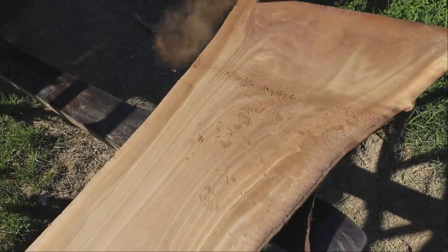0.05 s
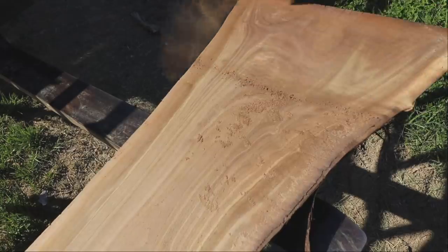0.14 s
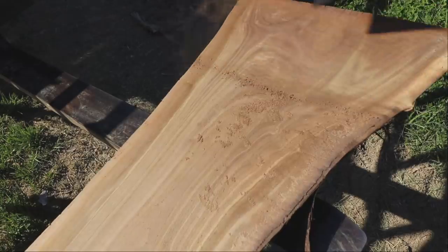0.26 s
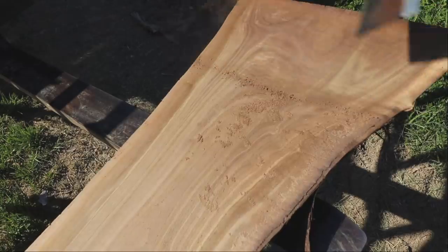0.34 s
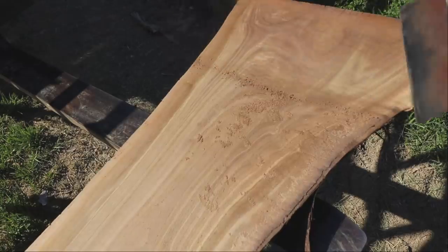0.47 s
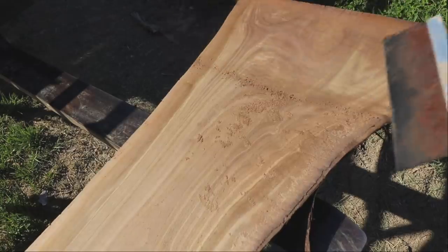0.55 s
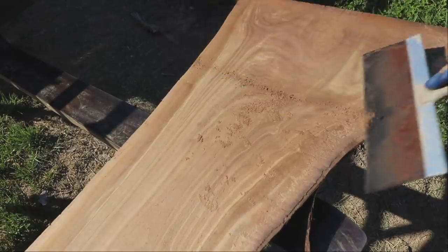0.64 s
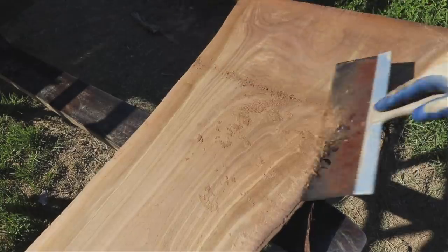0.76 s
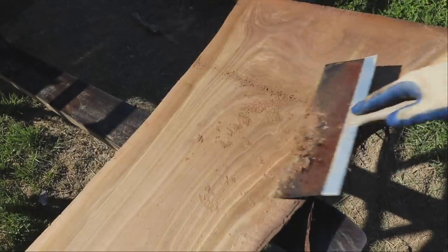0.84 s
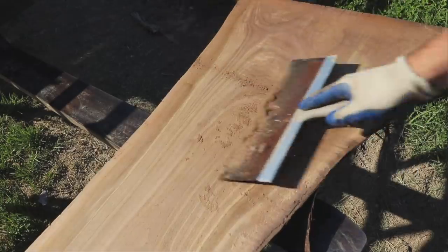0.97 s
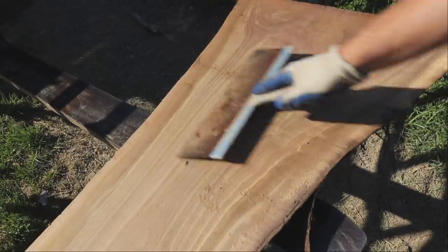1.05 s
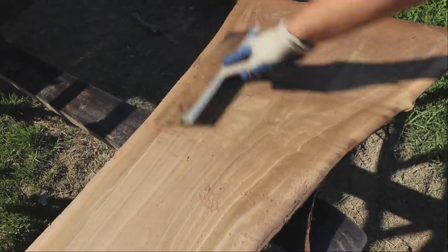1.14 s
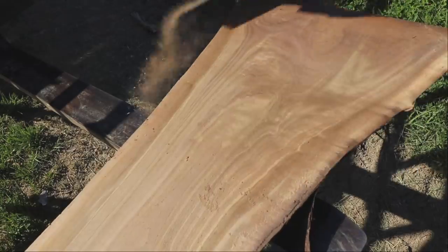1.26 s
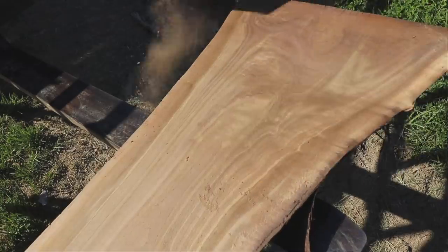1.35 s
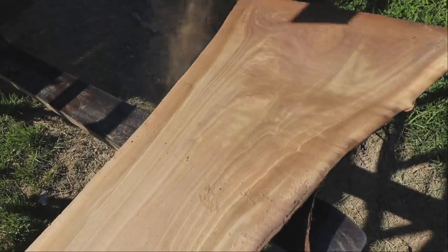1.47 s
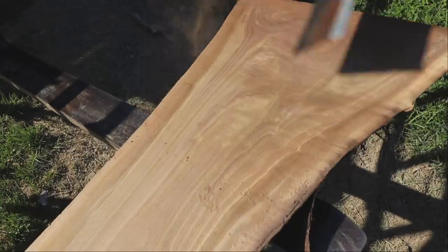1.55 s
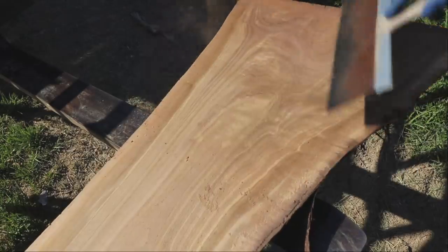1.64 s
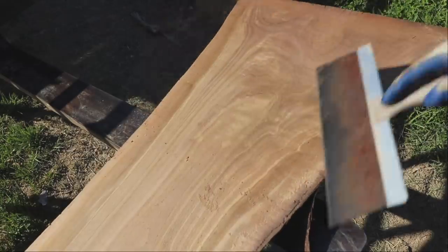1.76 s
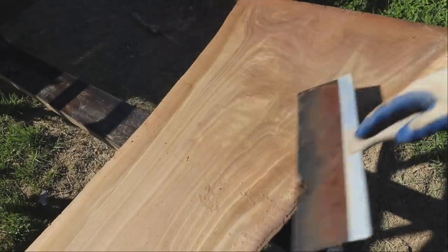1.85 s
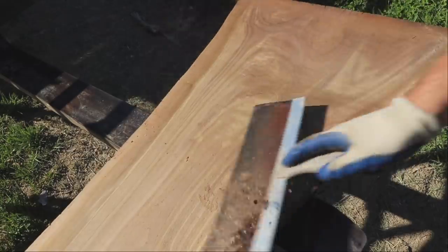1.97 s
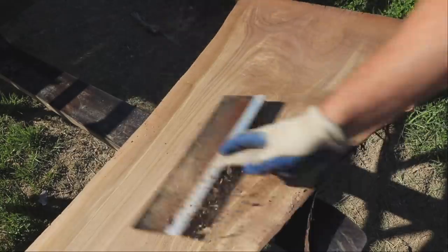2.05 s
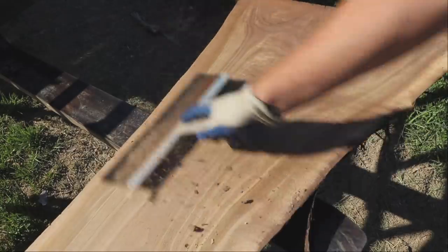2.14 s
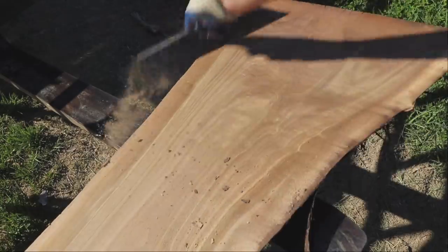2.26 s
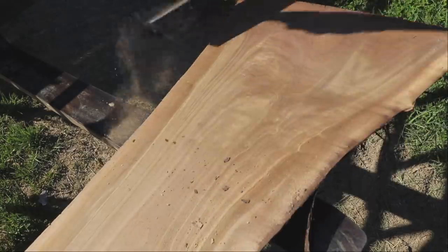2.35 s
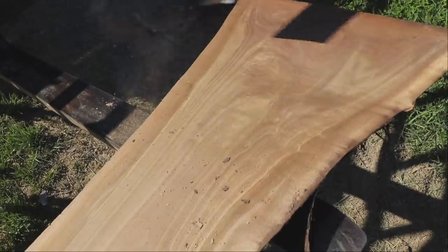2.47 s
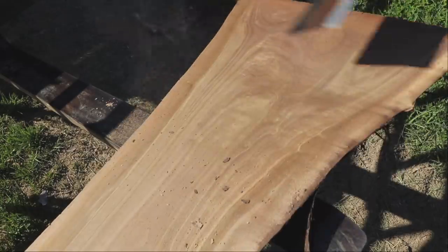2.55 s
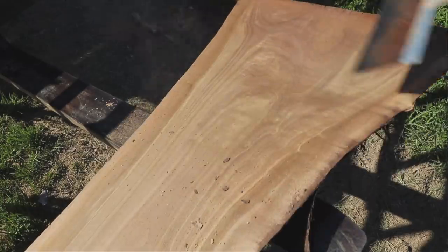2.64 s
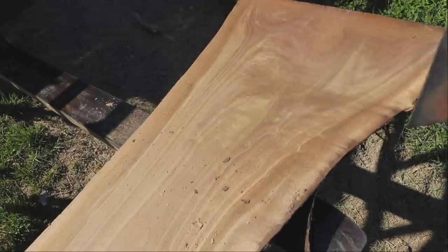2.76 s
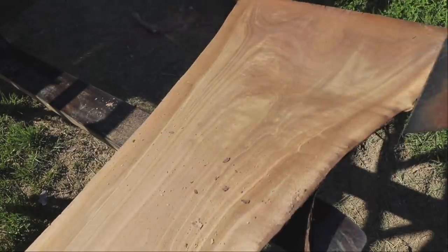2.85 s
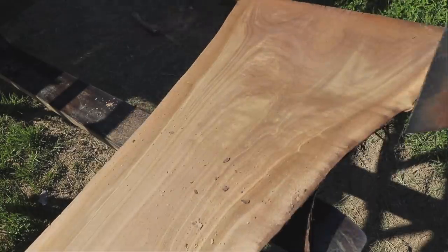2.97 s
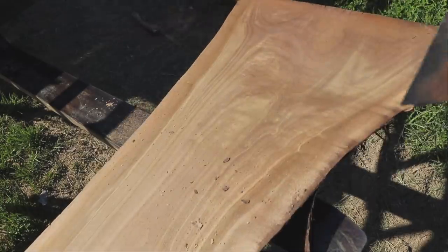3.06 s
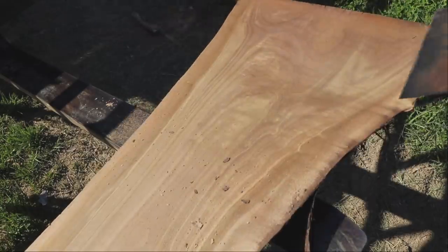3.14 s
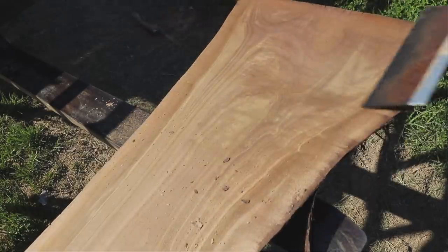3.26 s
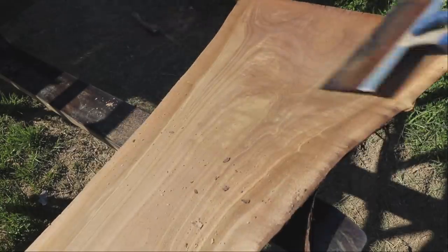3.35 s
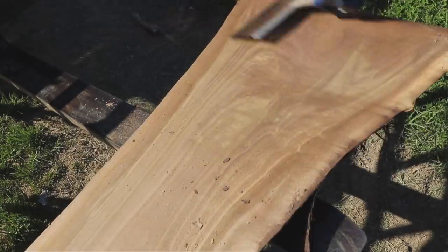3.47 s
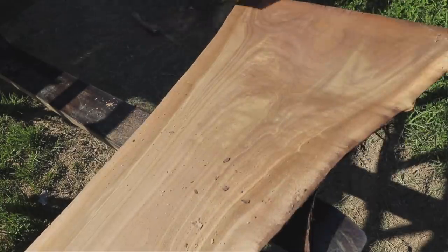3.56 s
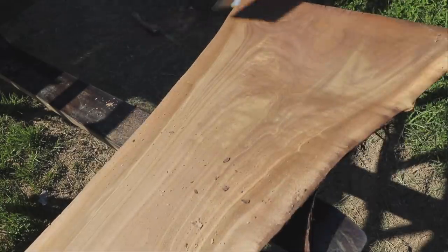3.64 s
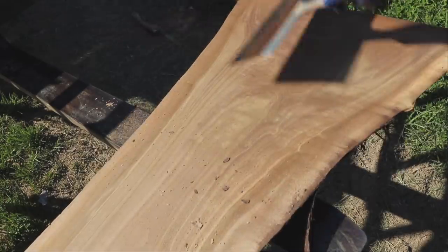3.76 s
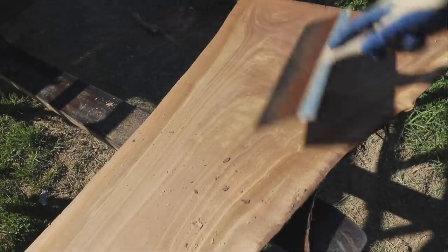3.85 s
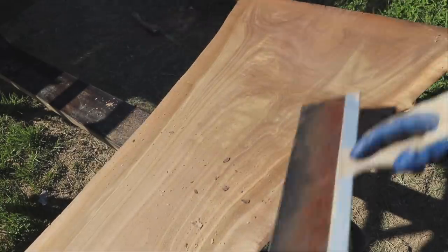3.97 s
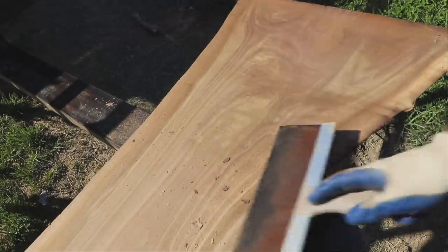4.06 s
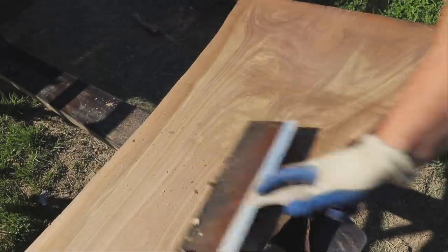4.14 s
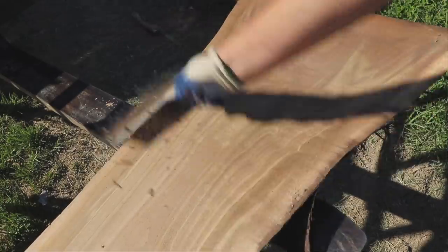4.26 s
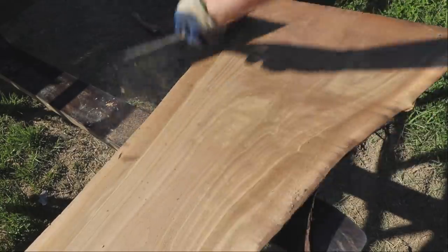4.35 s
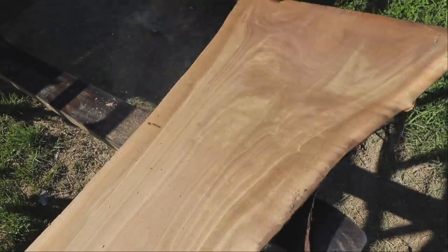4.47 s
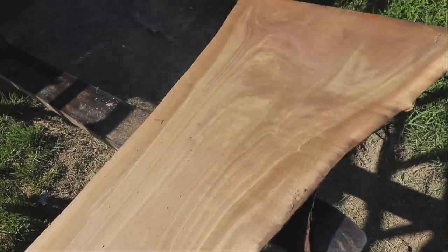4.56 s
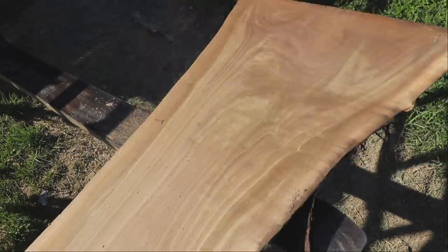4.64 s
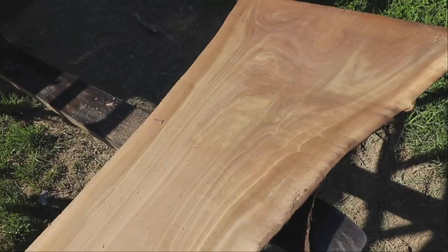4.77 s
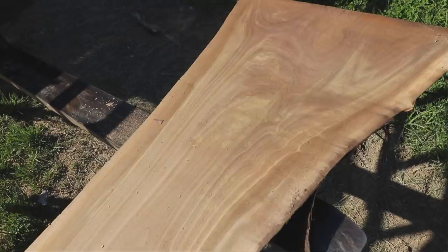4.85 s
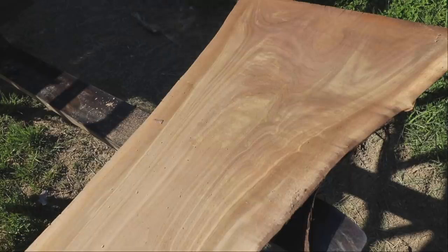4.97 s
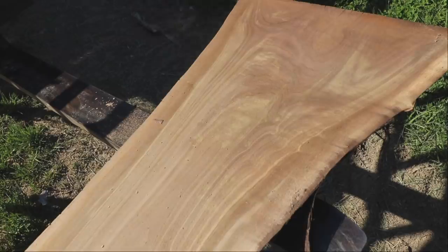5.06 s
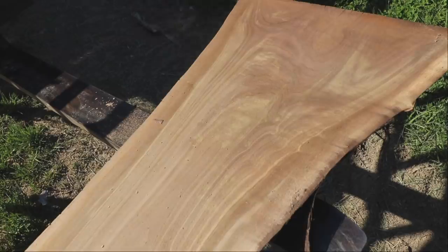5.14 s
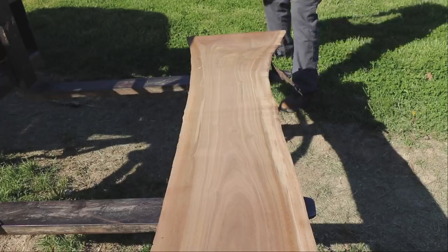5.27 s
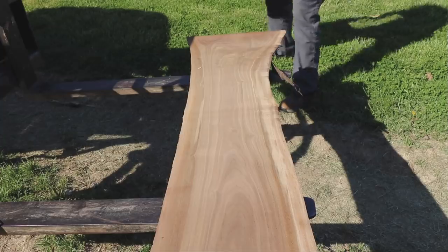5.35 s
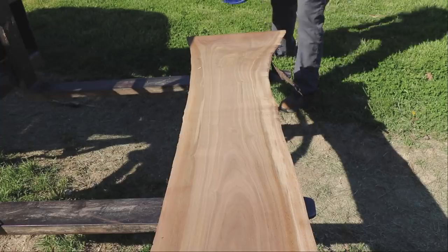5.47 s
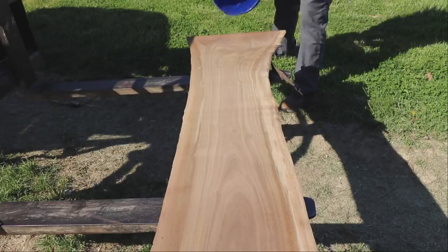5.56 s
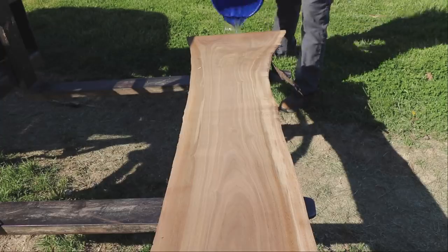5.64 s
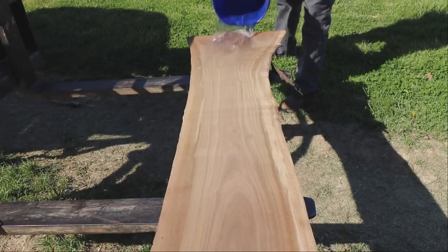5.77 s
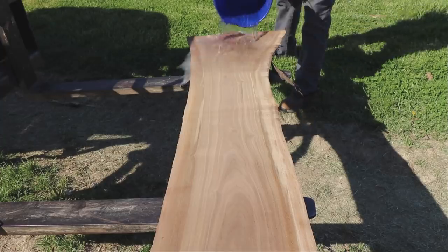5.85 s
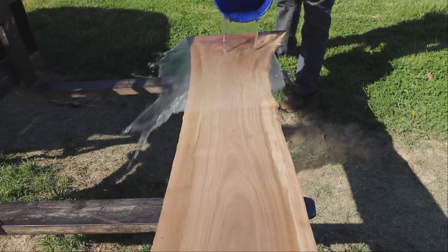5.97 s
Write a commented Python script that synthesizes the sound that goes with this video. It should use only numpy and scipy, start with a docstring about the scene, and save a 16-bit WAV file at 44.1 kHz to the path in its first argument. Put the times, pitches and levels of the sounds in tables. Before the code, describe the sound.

Five harsh metallic scrapes across a wooden plank outdoors, each cut off at the edge with a thin ring, ending in low wind buffeting and water.

```python
"""Outdoors at a wooden slab: a wide steel scraper pushes sawdust off in five strokes. The blade knocks
down (damped steel noise, slab modes), rasps over the grain (random slips through blade resonances),
skids off the edge and rings freely (decaying modes), while dust patters down (clouds of tiny impacts).
A few faint creaks; later, wind buffets the microphone (low noise in lumps) and the first water from a
bucket splashes on the slab (short clouds of impacts)."""
import sys
import numpy as np
from scipy import signal
from scipy.fft import rfft, irfft, next_fast_len
from scipy.io import wavfile
from scipy.ndimage import uniform_filter1d, map_coordinates

SR = 44100
rng = np.random.default_rng(int(sys.argv[2]) if len(sys.argv) > 2 else 0)


def log_audio(samples):
    """Write samples as a 16-bit WAV file to the path given in sys.argv[1]."""
    # one column per channel
    frames = np.atleast_2d(samples).T
    # limit to full scale, then quantise
    limited = np.clip(frames, -1, 1)
    pcm = np.round(limited * 32767).astype(np.int16)
    wavfile.write(sys.argv[1], SR, pcm)


N = 265041
TIME_S = np.arange(N) / SR
LOCAL_S = np.arange(SR * 3 // 4) / SR  # time within one stroke or event


def amp(db):
    """Decibels to gain."""
    return 10 ** (np.asarray(db) / 20)


def unit(x):
    """Scale to rms 1."""
    return x / np.sqrt(np.mean(x ** 2) + 1e-20)


def along(points, hz):
    """(Hz, value) points interpolated on a log frequency axis."""
    f, v = np.transpose(points)
    return np.interp(np.log(hz + 1), np.log(f), v)


def wobble(knots_per_s, size):
    """Smooth random curve through normally distributed knots."""
    knots = rng.standard_normal(int(size * knots_per_s / SR) + 4)
    coarse = np.arange(0, size + 64, 64)
    curve = map_coordinates(knots, [coarse * knots_per_s / SR])
    return np.interp(np.arange(size), coarse, curve)


def gate(length_s, rise_s, fall_s):
    """Linear rise, hold until length_s, then exponential decay of time constant fall_s."""
    opening = np.clip(LOCAL_S / rise_s, 0, 1)
    return opening * np.exp(-np.maximum(LOCAL_S - length_s, 0) / fall_s)


def coloured(x, gain):
    """Causal minimum-phase filter of magnitude gain(Hz), via the folded cepstrum."""
    m = 2 * next_fast_len(len(x) // 2 + 4096)
    magnitude = np.maximum(gain(np.fft.rfftfreq(m, 1 / SR)), 1e-6)
    cepstrum = irfft(np.log(magnitude))
    cepstrum[1:m // 2] *= 2
    cepstrum[m // 2 + 1:] = 0
    return irfft(rfft(x, m) * np.exp(rfft(cepstrum)))[:len(x)]


def grains(rate_hz, spread_db):
    """Random tiny impacts of uneven strength and sign, rms 1."""
    size = len(LOCAL_S)
    hits = rng.random(size) < rate_hz / SR
    sizes = amp(spread_db * np.clip(rng.standard_normal(size), -2, 2))
    return unit(hits * sizes * rng.choice([-1, 1], size))


def ring(modes, scatter_db):
    """Exponentially decaying modes at fresh random strengths, starting near rms 1."""
    hz, db, t60_s = np.transpose(modes)[:, :, None]
    gains = amp(db + scatter_db * rng.standard_normal(hz.shape))
    gains = gains * rng.choice([-1, 1], hz.shape)
    waves = np.sin(2 * np.pi * hz * LOCAL_S) * np.exp(-np.log(1000) * LOCAL_S / t60_s)
    return np.sqrt(2) * (gains * waves).sum(0) / np.linalg.norm(gains)


def burst(t60_s, size):
    """White noise that decays exponentially."""
    return rng.standard_normal(size) * np.exp(-np.log(1000) * np.arange(size) / SR / t60_s)


def add(track, start_s, sound):
    """Mix a sound in at start_s."""
    part = track[max(round(start_s * SR), 0):][:len(sound)]
    part += sound[:len(part)]


def outdoors():
    """Steady distant background, plus low-frequency lumps of wind on the microphone."""
    # background spectrum: (f/Hz, relative density/dB)
    air_spectrum = [(59, -31), (100, -7.5), (206, -8.5), (295, -11.5), (365, -18.5), (721, -20),
                    (872, -23.5), (1680, -29.5), (14400, -43.5), (16000, -44.5)]
    # background level: (t/s, level/dB)
    air_level = [(0, -58.5), (5.2, -58), (5.65, -61), (6, -58)]
    # buffeting spectrum: (f/Hz, relative density/dB)
    buffet_spectrum = [(12, -38.5), (20, -8), (53, 4), (97, 1.5), (141, -1.5), (228, -14.5), (252, -18),
                       (600, -43), (780, -79.5), (1320, -120)]
    # buffeting before random wobble: (t/s, level/dB)
    wind = [(0, -63), (1.85, -63), (2.3, -67), (4.05, -65), (4.55, -49.5), (5.05, -50), (5.38, -33.5),
            (5.82, -35), (6.01, -44)]
    # brief puffs before random wobble: (t/s, level/dB)
    gusts = [(.84, -56), (1.54, -54), (1.88, -54), (3.0, -55), (4.75, -46)]
    gust_s = .04  # from peak to 1/e
    m = next_fast_len(N)
    hz = np.fft.rfftfreq(m, 1 / SR)

    def noise(spectrum):
        """Gaussian noise shaped to a spectrum, rms 1."""
        shaped = rfft(rng.standard_normal(m)) * amp(along(spectrum, hz))
        return unit(irfft(shaped, m)[:N])

    air_db = np.interp(TIME_S, *np.transpose(air_level))
    wind_db = np.interp(TIME_S, *np.transpose(wind))
    puffs = sum(amp(db) * np.exp(-((TIME_S - s) / gust_s) ** 2) for s, db in gusts)
    buffet = (amp(wind_db) + puffs) * amp(2.7 * wobble(22, N))
    return noise(air_spectrum) * amp(air_db) + noise(buffet_spectrum) * buffet


def pressed_blade(hz, edge_hz, stiffness):
    """Gain of the loaded blade: broad resonances, 9 dB shelf below its lowest flexing frequency."""
    # blade pressed on the wood: (f/Hz, relative density/dB)
    base = [(80, -50.5), (350, -22), (560, -6), (800, -7.5), (980, 1), (1300, -1.5), (1800, -3), (2200, -7),
            (3500, -11), (4300, -21), (6500, -28.5), (9000, -36), (12000, -39), (15500, -48)]
    # its resonances: (f at stiffness 1/Hz, width/Hz, boost/dB)
    flex = [(1680, 100, 2.5), (3554, 180, 7), (5140, 310, 5.5), (7700, 270, 2.5), (10000, 400, 6),
            (12400, 370, 2)]
    boost_db = sum(db * np.exp(-((hz - fc * stiffness) / width) ** 2) for fc, width, db in flex)
    shelf_db = -9 / (1 + (hz / edge_hz) ** 12)
    return amp(along(base, hz) + boost_db + shelf_db)


def shifting(x, depth_db):
    """The contact line wanders along the blade: patches of the spectrum swell and fade."""
    z = signal.stft(x, nperseg=512)[2]
    field = uniform_filter1d(rng.standard_normal(z.shape), size=3, axis=0)
    field = uniform_filter1d(field, size=9, axis=1)
    return signal.istft(z * amp(depth_db * unit(field)), nperseg=512)[1][:len(x)]


def radiated(x):
    """The open slab radiates its own modes but hardly any deep bass: 130-600 Hz band-pass."""
    return signal.sosfilt(signal.butter(3, [130, 600], "bandpass", fs=SR, output="sos"), x)


def scrape(rasp_db, grit_db, drone_db, edge_hz, stiffness, t60_s, bright_db_per_oct):
    """The edge catches and slips on fibres thousands of times a second, shaking blade and slab."""
    # slab under the pressing blade: (f/Hz, relative level/dB, t60/s)
    drone = [(175, -9, 0.047), (277, 0, 0.054), (346, -0.5, .08)]
    size = len(LOCAL_S)

    def blade(hz):
        return pressed_blade(hz, edge_hz, stiffness)

    def treble(hz):
        return 1 - 1 / (1 + (hz / 6200) ** 10)

    def rasp_gain(hz):
        tilt_db = bright_db_per_oct * np.log2(hz / 1500 + .1)
        return blade(hz) * amp(tilt_db) * np.sqrt(1 - treble(hz))

    slips = grains(rate_hz=13000, spread_db=3.5) * amp(.9 * wobble(110, size))
    # the wood damps the steel, so each slip rings only briefly
    steel = 0.027 * burst(t60_s, size=SR // 4)
    steel[0] += 1
    shaken = signal.fftconvolve(slips, steel)[:size]
    rasp = amp(rasp_db) * unit(shifting(coloured(shaken, rasp_gain), depth_db=1.94))
    # sawdust grit crushed under the edge
    grit = coloured(grains(rate_hz=9000, spread_db=3.5), lambda hz: blade(hz) * treble(hz))
    hiss = amp(rasp_db + grit_db) * unit(shifting(grit, depth_db=1.5))
    wood = signal.fftconvolve(slips, ring(drone, scatter_db=1.5))[:size]
    return rasp + hiss + amp(drone_db) * unit(radiated(wood))


def strokes():
    """Blade creeps, speeds up, runs off the edge: speed raises the rasp, the growing heap adds grit."""
    # pushes: (blade settles t/s, speeds up t/s, full speed t/s, reaches edge t/s,
    # full-speed rasp level/dB, grit at the edge re rasp/dB, lowest flexing f/Hz,
    # stiffness factor on resonances, brightness/dB per octave)
    pushes = [(0.0, -.2, -.02, .017, -18, -20, 1077, 1.08, -.5),
              (.779, .945, 1.235, 1.321, -17.5, -23.5, 920, 1.004, 0),
              (2.026, 1.995, 2.235, 2.321, -17.5, -24, 930, .995, -.1),
              (3.402, 3.408, 3.525, 3.66, -17.5, -15.5, 1150, 1.01, 1.3),
              (4.228, 4.222, 4.325, 4.412, -16.7, -18.5, 870, .981, 1.1)]
    slow_db = -15  # rasp of a creeping blade re full speed
    sag_db_per_s, lift_db_per_s = 17, 470  # arm eases off past full speed; fade past the edge
    bare_grit_db, heap_s = -27.5, .075  # grit on bare wood re rasp; time constant of its swell
    drone_slow_db, drone_fast_db = -41, -50
    out = np.zeros(N)
    for s, push_s, full_s, edge_s, db, edge_grit_db, edge_hz, stiffness, bright in pushes:
        t = s + LOCAL_S
        speed = np.sin(np.pi / 2 * np.clip((t - push_s) / (full_s - push_s), 0, 1))
        heap = np.exp(np.minimum(t - edge_s, 0) / heap_s)
        lift_db = -lift_db_per_s * np.maximum(t - edge_s, 0)
        sag_db = -sag_db_per_s * np.maximum(t - full_s, 0)
        rasp_db = db + slow_db * (1 - speed) + sag_db + lift_db
        grit_db = bare_grit_db + (edge_grit_db - bare_grit_db) * heap
        drone_db = drone_slow_db + (drone_fast_db - drone_slow_db) * speed + lift_db
        sound = scrape(rasp_db, grit_db, drone_db, edge_hz, stiffness, t60_s=.09,
                       bright_db_per_oct=bright)
        add(out, s, sound * np.clip(LOCAL_S / .002, 0, 1))
    return out


def skids():
    """The last corner drags over the edge, ever lighter; the blade hangs free and flexes lower."""
    # skids: (t/s, length/s, initial rasp level/dB, initial slab drone level/dB,
    # lowest flexing f/Hz, stiffness factor)
    corners = [(.015, .04, -43, -38, 500, 1.0), (1.324, .052, -31.5, -42, 445, 1.2),
               (2.323, .084, -26, -38, 450, .96), (3.668, .03, -30.5, -43, 600, 1.0),
               (4.425, .055, -29, -41, 750, .99)]
    fade_db_per_s = 55
    out = np.zeros(N)
    fade_db = -fade_db_per_s * LOCAL_S
    for s, length_s, db, drone_db, edge_hz, stiffness in corners:
        sound = scrape(db + fade_db, -21.5, drone_db + fade_db, edge_hz, stiffness, t60_s=.28,
                       bright_db_per_oct=1.7)
        add(out, s, sound * gate(length_s, rise_s=.002, fall_s=.0089))
    return out


def free_ring():
    """Off the wood the blade sings on; the corner that leaves last favours a pair of modes."""
    # blade springs off the edge: (t/s, ring level/dB, brightness/dB per octave)
    releases = [(.03, -44, -1), (1.365, -43.5, -2.5), (2.385, -38.5, -2), (3.681, -37.5, 2.5),
                (4.505, -46, 1)]
    # most excited modes at each release: (first f/Hz, second f/Hz)
    favoured_pairs = [(1807, 3373), (820, 2001), (1685, 2631), (1429, 2242), (2631, 1067)]
    # free steel blade: (f/Hz, relative level/dB, t60/s)
    modes = [(599, -14, 0.64), (688, -8, 0.59), (723, -16, 1.0), (820, -5, 0.5), (908, -14, 0.69),
             (995, -16, 1.1), (1067, -6, 0.39), (1196, -7, 0.73), (1429, -10, 1.0), (1498, -13, 0.51),
             (1685, 0, 0.7), (1741, -10, 0.57), (1807, -16, 0.68), (1965, -3, 0.42), (2001, -7, 0.41),
             (2242, -7, 0.37), (2301, -8, 0.43), (2631, -10, 0.65), (2996, -10, 0.54), (3270, -19, 0.46),
             (3373, -12, 0.48), (3690, -23, 0.3), (3830, -20, 0.3), (4221, -19, 0.35), (5163, -22, 0.3),
             (5669, -22, 0.3)]
    out = np.zeros(N)
    hz, level_db, t60_s = np.transpose(modes)
    for (s, db, bright_db_per_oct), favoured in zip(releases, favoured_pairs):
        mode_db = level_db + 9 * np.isin(hz, favoured) + bright_db_per_oct * np.log2(hz / 1500)
        song = ring(np.transpose([hz, mode_db, t60_s]), scatter_db=1)
        song = song * (1 - np.exp(-LOCAL_S / .006))
        # countless weaker modes blur into a short shimmer
        noise = rng.standard_normal(len(LOCAL_S))
        shimmer = unit(coloured(noise, lambda f: pressed_blade(f, edge_hz=450, stiffness=1)))
        add(out, s, amp(db) * (song + amp(-4) * shimmer * np.exp(-LOCAL_S / .05)))
    return out


def showers(rows, rate_hz, spread_db, fall_s):
    """Short clouds of tiny impacts landing in clumps, each cloud around its own pitch."""
    out = np.zeros(N)
    for s, length_s, db, centre_hz, octaves in rows:
        def band(hz):
            return 1 / np.sqrt(1 + (np.log2((hz + 1) / centre_hz) / octaves) ** 6)

        clumps = grains(rate_hz, spread_db) * amp(2.5 * wobble(45, len(LOCAL_S)))
        cloud = unit(coloured(clumps, band))
        add(out, s, amp(db) * cloud * gate(length_s, rise_s=0.0036, fall_s=fall_s))
    return out


def dust():
    """Soft showers of dust and crumbs: dense tiny impacts."""
    # showers: (t/s, length/s, level/dB, centre f/Hz, half-width/octaves)
    clouds = [(.06, .28, -59.5, 1600, 1.1), (.392, 0.0028, -62, 800, .7), (.664, 0.0034, -62, 800, .8),
              (1.55, 0.116, -71.5, 3300, .7), (2.575, .33, -68.5, 3170, 0.45),
              (3.081, .015, -53.5, 1790, 0.93), (3.11, 0.053, -58.5, 1880, 1),
              (4.108, 0.0113, -60.5, 5420, 1.2), (5.064, .09, -62.5, 1145, 1), (5.27, .2, -70, 3880, .7)]
    return showers(clouds, rate_hz=11000, spread_db=3.5, fall_s=.02)


def knocks():
    """Blade or hand strikes the wood: a damped steel clack over the low ring of the slab."""
    # strikes: (t/s, steel clack level before 9 dB cut/dB, wood knock level before cut and filter/dB)
    strikes = [(0.7606, -22, -30.5), (1.9782, -30, -33.5), (2.0002, -21, -36), (2.0275, -23, -35.5),
               (2.9686, -33, -29.5), (2.9853, -34, -29), (3.0342, -46, -32), (3.3479, -20, -33.5),
               (3.3803, -14.5, -30), (3.391, -19, -28), (4.1947, -31, -46), (4.2141, -20, -25.5),
               (4.459, -21, -41), (4.5036, -25, -47)]
    # slab modes: (f/Hz, relative level/dB, t60/s)
    slab = [(172.8, -2.5, .45), (240, -9, 0.16), (287, 0.5, .28), (339, -5, 0.1), (394.4, -4, .15)]
    out = np.zeros(N)
    for s, clack_db, knock_db in strikes:
        noise = burst(t60_s=0.11, size=SR // 4)
        clack = coloured(noise, lambda hz: pressed_blade(hz, edge_hz=320, stiffness=1))
        add(out, s, amp(clack_db - 9) * clack / np.std(clack[:SR // 100]))
        add(out, s, amp(knock_db - 1.5) * radiated(ring(slab, scatter_db=2.0)))
    return out


def creaks():
    """Faint creaks: very uneven impacts in a narrow band."""
    # creaks: (t/s, length/s, level/dB, centre f/Hz, half-width/octaves)
    squeaks = [(3.032, 0.032, -56, 1895, 0.062), (3.29, 0.024, -67, 1850, 0.032)]
    return showers(squeaks, rate_hz=5200, spread_db=9, fall_s=0.028)


def splashes():
    """Water slaps the slab: short clouds of sparser impacts that die away fast."""
    # slaps: (t/s, length/s, level/dB, centre f/Hz, half-width/octaves)
    slaps = [(5.819, 0.0064, -49, 1700, 1.9), (5.86, 0.0093, -48.5, 2940, 0.41),
             (5.876, 0.0135, -47.5, 2590, 0.45), (5.872, .055, -54.5, 1010, .45),
             (5.908, .036, -54.5, 2230, 0.98), (5.945, .08, -61.5, 1960, 0.79)]
    return showers(slaps, rate_hz=4900, spread_db=2.5, fall_s=0.0053)


def scene():
    """Scraper, falling dust, creaks, water and wind at one microphone."""
    scraper = strokes() + skids() + free_ring() + knocks()
    return (outdoors() + scraper + dust() + creaks() + splashes())[None]


def record(dry):
    """Band limit: nothing passes from top_hz up."""
    top_hz = 15600
    m = next_fast_len(N + SR // 4)
    passed = np.fft.rfftfreq(m, 1 / SR) < top_hz
    return irfft(rfft(dry, m) * passed, m)[:, :N]


dry = scene()
out = record(dry)
log_audio(out)
```